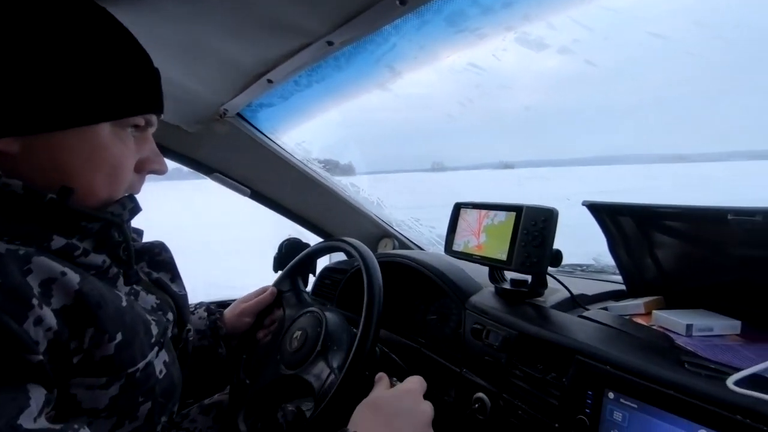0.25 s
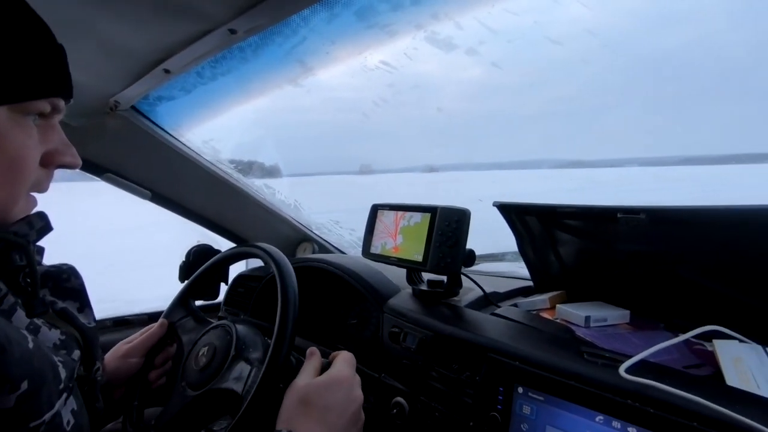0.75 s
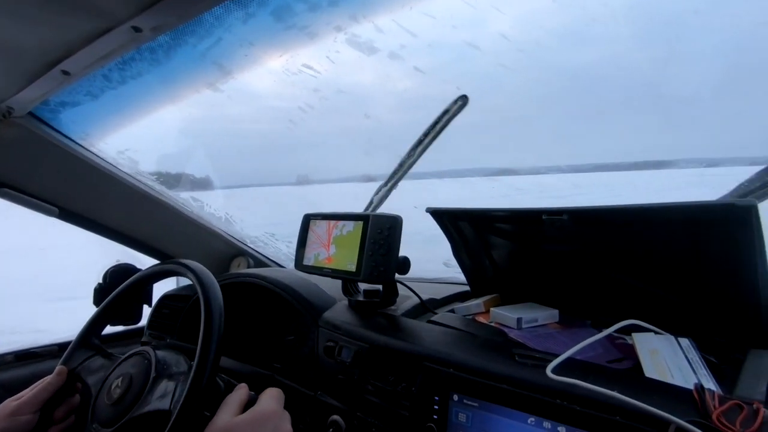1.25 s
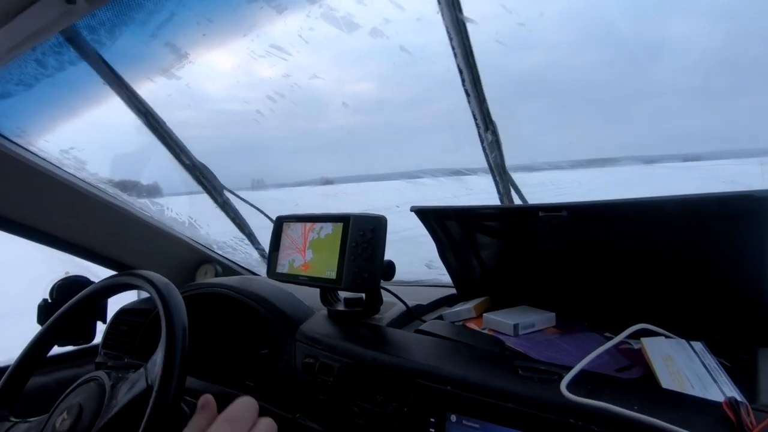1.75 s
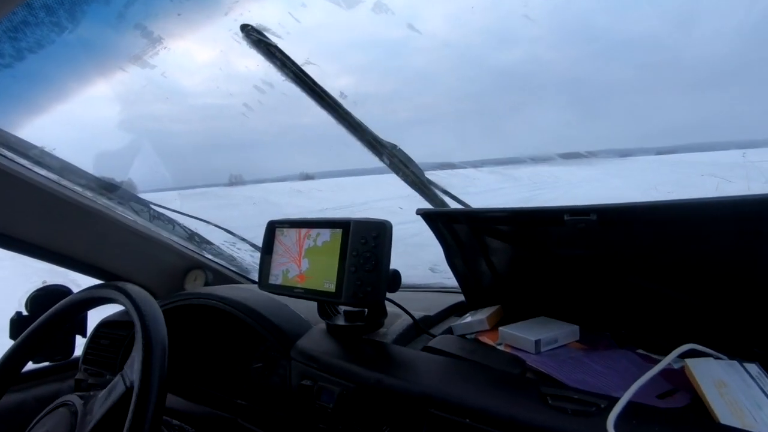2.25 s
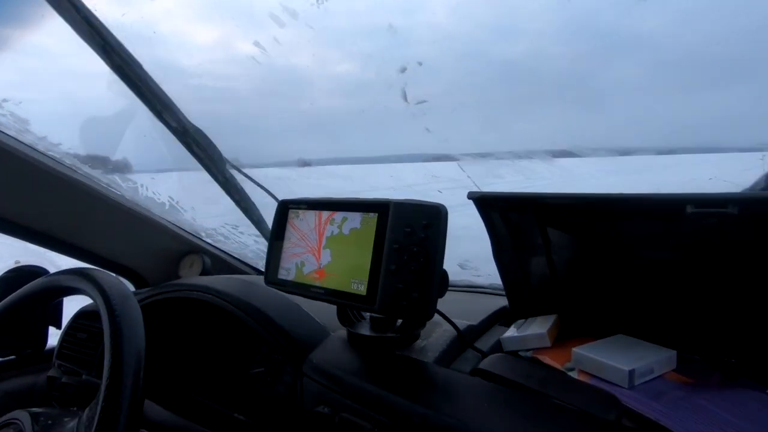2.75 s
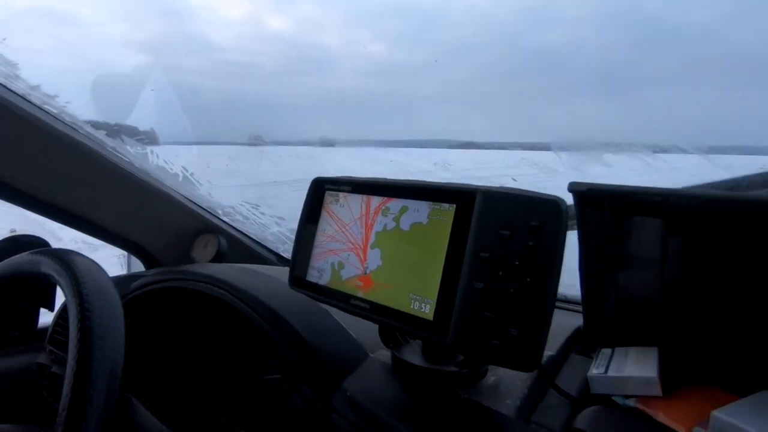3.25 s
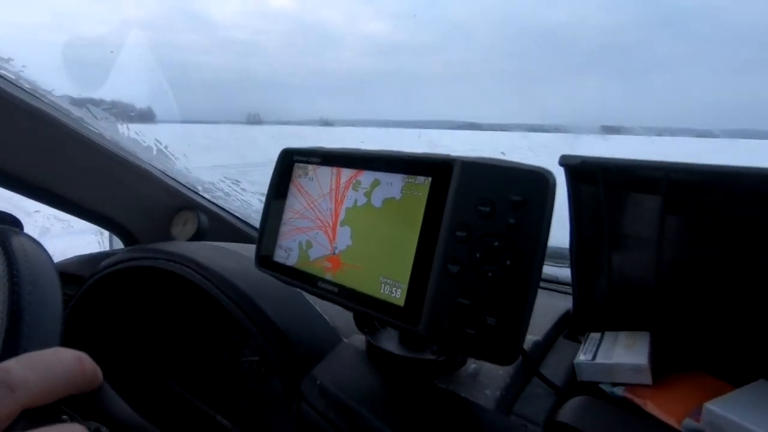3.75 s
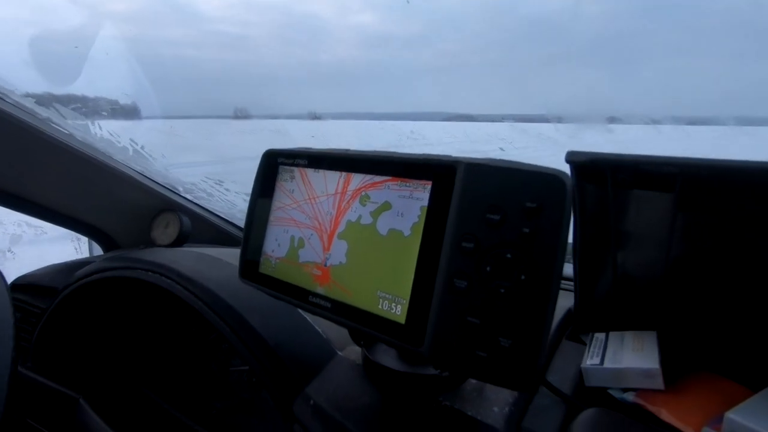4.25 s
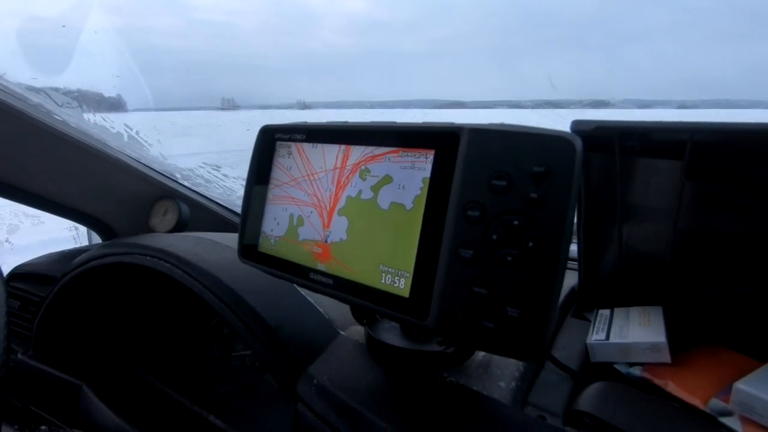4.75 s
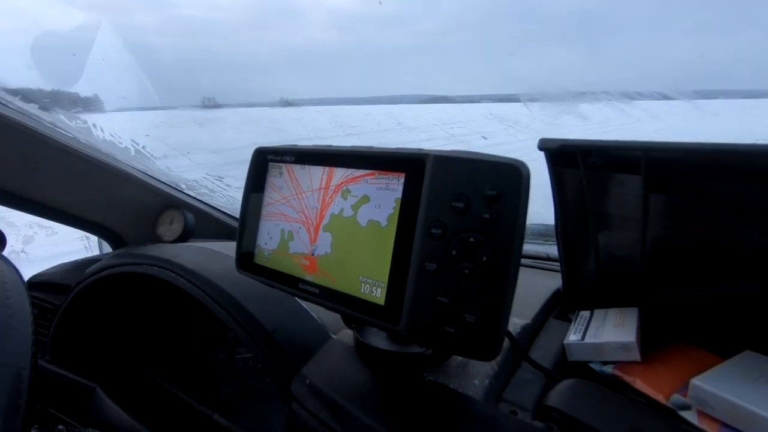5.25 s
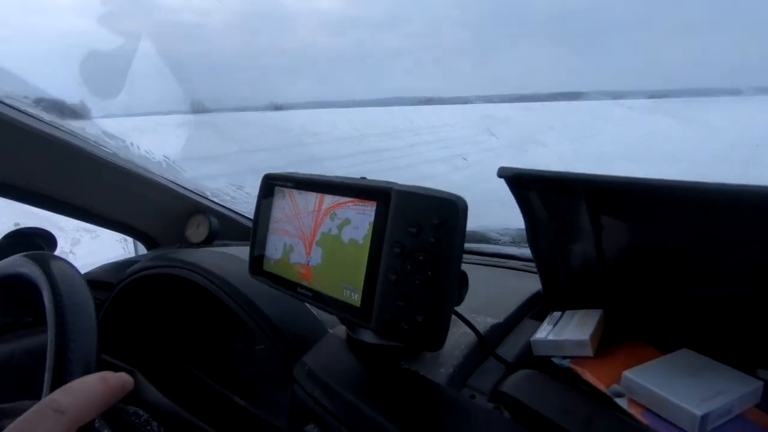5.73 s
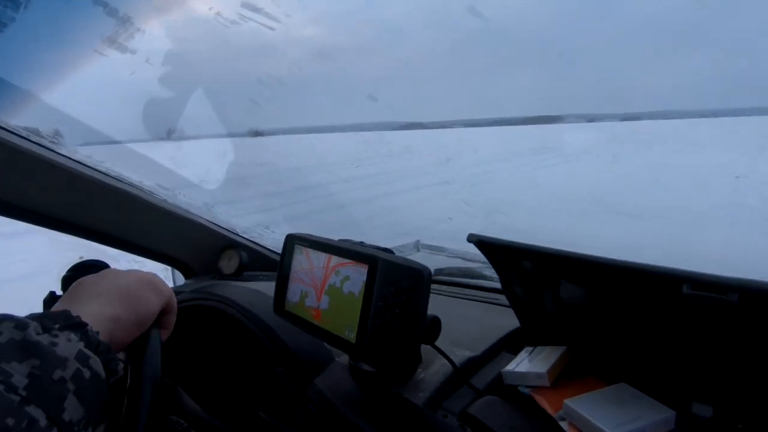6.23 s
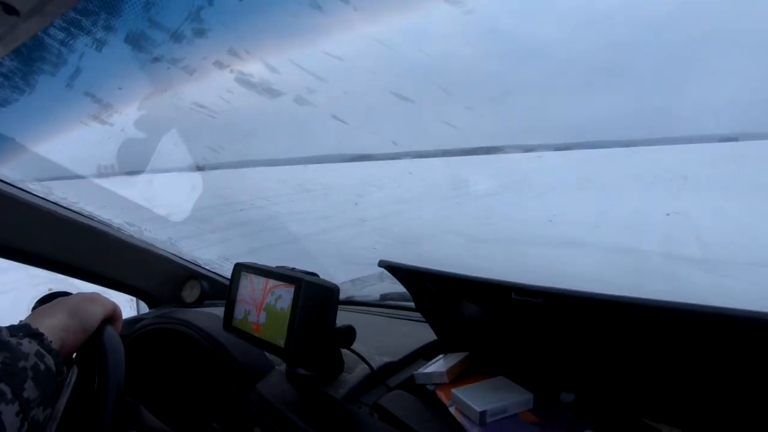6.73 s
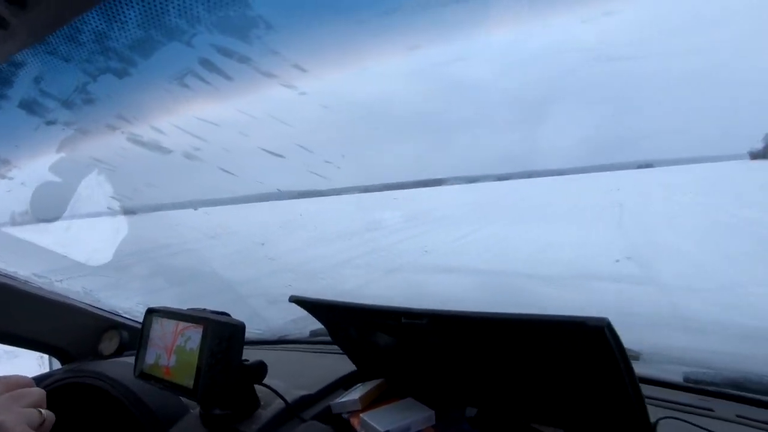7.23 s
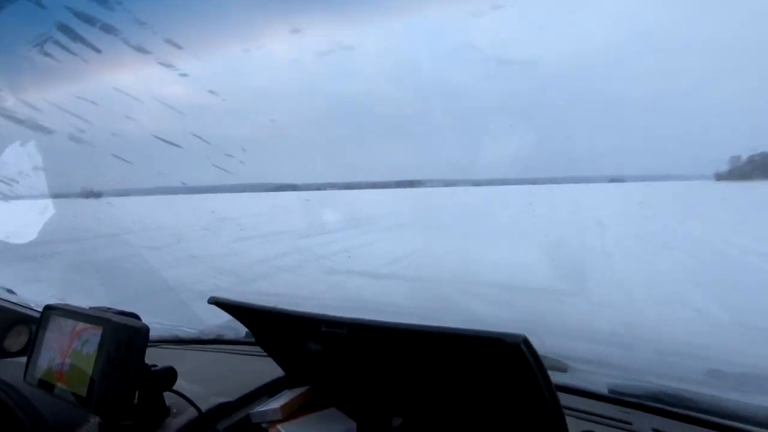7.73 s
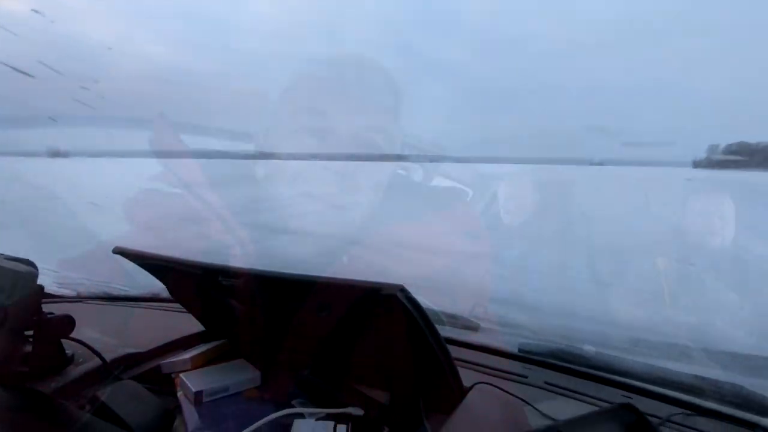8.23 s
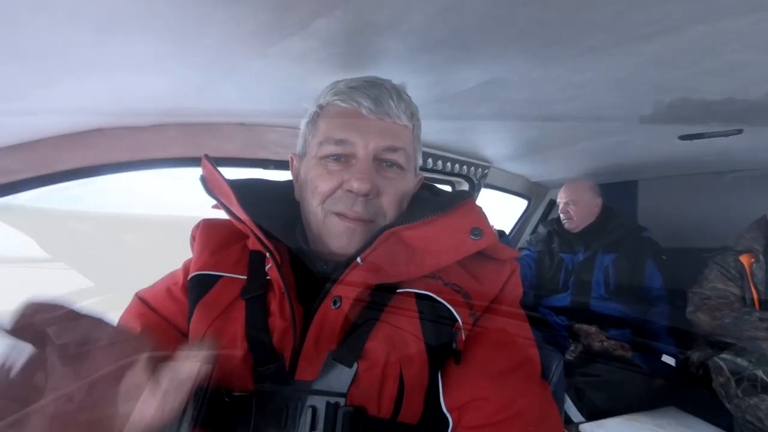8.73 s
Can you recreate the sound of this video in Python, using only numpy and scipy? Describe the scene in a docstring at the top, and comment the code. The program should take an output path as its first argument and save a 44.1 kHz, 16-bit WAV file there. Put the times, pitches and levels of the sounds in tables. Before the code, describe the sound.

For about nine seconds we are inside a hovercraft cabin at constant cruising speed. A loud, deep engine boom near 106 hertz holds almost the same pitch throughout, joined by lower shaft throbs, a fan hum and a ladder of buzzing propeller tones. Dark turbulent air and skirt rumble breathe beneath, mostly bass with little hiss. Small metal parts on the dashboard jingle finely and constantly. A clear double rattling knock comes around 0.55 seconds, smaller jolts at 1.3, 1.6 and 2.2, scattered tinkles from 2.6 to 5.5, then bumps at 5.9, 6.1 and 7.0 to 7.5, and a bright ringing cluster at 7.7. The close, hand-held microphone moves, so the blade tones shift in colour; upper ones become duller after 6.6. Near 8.5 the boom dips briefly to nothing and returns, while air rumble swells.

```python
"""Hovercraft cabin at cruising speed

A four-cylinder engine booms at its firing rate; it drives a four-blade propeller through a reduction and a
lift fan by belt, all as sines geared to the crank. Airflow and skirt rumble fill the cabin as coloured noise.
Small loose metal parts jingle on the dashboard as resonances rung by tiny contacts, jolted by bumps.
The propeller's blade tones swell and thin against two cabin echoes as the hand-held microphone leans."""
import sys
import numpy as np
from scipy import signal
from scipy.fft import rfft, irfft
from scipy.io import wavfile

SR = 44100
rng = np.random.default_rng(int(sys.argv[2]) if len(sys.argv) > 2 else 0)


def materialize(psi):
    """Save the field psi as 16-bit PCM at rate SR to the path in sys.argv[1].

    A 1-D psi becomes a single channel; in a 2-D psi each row is a channel.
    """
    bounded = np.clip(np.atleast_2d(psi).T, -1, 1)
    quanta = np.round(bounded * 32767).astype(np.int16)
    wavfile.write(sys.argv[1], SR, quanta)


N = 395998

PROPELLER_RATIO, FAN_RATIO = 0.3, 0.775   # shaft turns per crank turn
SOUND_M_PER_S = 343

# Airflow swells; only the change around each mean is heard.
# Each row: time in seconds, then level in dB of the bass, the low mids and the upper mids.
AIR_SWELLS = [(0, -28, -47.5, -58), (.3, -30.5, -45.5, -60), (.64, -29.5, -54.5, -58), (1, -29, -51.5, -60),
              (1.4, -29.5, -47.5, -59), (2.1, -30, -46, -59), (2.7, -33, -48.5, -60),
              (3.1, -32.5, -47, -60.5), (5.7, -30, -46.5, -60.5), (6.2, -31.5, -44.5, -60.5),
              (7.6, -30.5, -47, -60), (8.5, -26, -43, -59), (8.98, -26.5, -48, -58)]
# The hand-held microphone leans toward the windscreen and back.
# Each row: time in seconds, extra path of the first cabin echo in metres.
MICROPHONE_LEAN = [(0.0, 0.001), (1.0, -0.002), (1.6, 0.027), (2.2, 0.054), (2.7, 0.071), (3.2, 0.144),
                   (3.8, 0.159), (4.4, 0.195), (5.4, 0.192), (5.9, 0.125), (6.3, 0.065), (6.7, 0.021),
                   (7.2, 0.026), (8.0, 0.092), (8.98, 0.143)]
# Jingling resonances: three single parts first, then the whole tray.
# Each row: pitch in Hz, width of one resonator pass in Hz, relative drive in dB by rattling, and by jolts.
JINGLING_PARTS = [(6480, 330, 3, -6), (7070, 100, 9, -3), (9450, 330, 7, -6), (7720, 330, 2, -1),
                  (8300, 2800, -2, -4), (12700, 2400, -12, -5), (14700, 1800, -21, -11)]


def from_db(db):
    """Decibels to gain."""
    return 10 ** (np.asarray(db) / 20)


def rms_one(x):
    """Scale to unit rms."""
    return x / np.sqrt(np.mean(x ** 2) + 1e-20)


def in_time(rows):
    """Columns of a curve table, one value per sample."""
    s, *columns = np.transpose(rows)
    return [np.interp(np.arange(N) / SR, s, column) for column in columns]


def drift(rate_hz):
    """Slow random curve of spread 1: noise at every 40th sample through a double one-pole low-pass."""
    r = np.exp(-80 * np.pi * rate_hz / SR)
    noise = rng.standard_normal(N // 40 + 2002)
    slow = signal.lfilter([1], [1, -2 * r, r * r], noise)[2000:]   # without the filter's start-up
    return np.interp(np.arange(N) / 40, np.arange(len(slow)), rms_one(slow - slow.mean()))


def resonate(x, hz, width_hz):
    """Two-pole resonance, gain 1 on top."""
    r = np.exp(-np.pi * width_hz / SR)
    zeros = np.array([1, 0, -1]) * (1 - r * r) / 2
    poles = [1, -2 * r * np.cos(2 * np.pi * hz / SR), r * r]
    return signal.lfilter(zeros, poles, x)


def tone(turns, level_db, waver_db, rate_hz):
    """A sine locked to a shaft, at an rms level that wavers."""
    gain = np.sqrt(2) * from_db(level_db + waver_db * drift(rate_hz))
    return gain * np.sin(2 * np.pi * (turns + rng.random()))


def spells(rows):
    """Rows of start, hold and level as one gain: rise, hold, fall; powers add."""
    rise_s, fall_s = 0.035, 0.11
    t = np.arange(0, N + 40, 40) / SR
    power = np.zeros(len(t))
    for start_s, hold_s, level_db in rows:
        corners_s = np.cumsum([start_s - rise_s, rise_s, abs(hold_s), fall_s])
        power += from_db(2 * level_db) * np.interp(t, corners_s, [0, 1, 1, 0]) ** 2
    return np.interp(np.arange(N) / SR, t, np.sqrt(power))


def airflow():
    """Turbulent air and skirt rumble: coloured noise in five ranges, each breathing on its own."""
    # Colour of the rumble and airflow. Each row: frequency in Hz, relative level in dB per Hz.
    rumble = [(12, -30), (22, -12.5), (45, -6), (85, 1.5), (135, -5), (170, -8.5), (230, -15), (320, -18.5),
              (500, -24.5), (650, -30.5), (900, -37.5), (1500, -41), (2600, -48), (3300, -55), (4200, -52),
              (5100, -60.5), (9000, -63.5), (11000, -86.5), (13000, -68.5), (15500, -74.5)]
    wander_db, mids_loss_db_per_m = 1.2, 18.5
    hz = np.maximum(np.arange(N // 2 + 1) * SR / N, 1)
    knots_hz, colour_db = np.transpose(rumble)
    noise = rfft(rng.standard_normal(N)) * from_db(np.interp(np.log(hz), np.log(knots_hz), colour_db))
    # share of the spectrum below each range edge; neighbours differ by one range
    below = [0] + [1 / (1 + (hz / edge_hz) ** 6) for edge_hz in (160, 310, 520, 780)] + [1]

    bass_db, low_mid_db, upper_db = in_time(AIR_SWELLS)
    lean_m = in_time(MICROPHONE_LEAN)[0]
    # the highest of the three middle ranges sinks as the microphone leans forward
    middle_db = [low_mid_db + wander_db * drift(1.5) - loss * lean_m for loss in (0, 0, mids_loss_db_per_m)]
    out = np.zeros(N)
    for lower, upper, level_db in zip(below, below[1:], [bass_db, *middle_db, upper_db]):
        # the curves give the change, the spectrum the mean level
        breath = from_db(level_db - level_db.mean() + 0.67 * drift(11.0))
        out += irfft(noise * (upper - lower), N) * breath
    return out * from_db(-5.0)


def rattling():
    """How hard each part is shaken: the whole tray never rests, single parts follow it loosely."""
    # Spells of harder rattling of the whole tray. Each row: start in seconds, hold in seconds, drive in dB.
    shakes = [(0, 0.11, -61), (.54, 0.041, -68), (.7, 0.45, -73.5), (1.25, 0.095, -62), (1.6, 0.33, -66.5),
              (2.19, 0.14, -65), (2.64, 0.026, -63), (2.76, .03, -64.5), (3.1, 0.25, -67),
              (3.38, 0.051, -65.5), (3.57, 0.031, -63.5), (3.82, .04, -59), (3.9, 0.033, -61.5),
              (4.11, 0.18, -65), (4.53, .04, -68.5), (4.89, .02, -69), (5.02, 0.19, -71),
              (5.48, 0.064, -64), (5.7, .2, -70.5), (5.95, 0.015, -61.5), (6.13, 0.095, -63.5),
              (6.3, 0.38, -67), (6.92, .07, -62.5), (7.11, 0.1, -63.5), (7.4, .15, -71), (7.7, 0.098, -62),
              (7.95, 0.29, -66), (8.45, .2, -67)]
    # A single part rings out by itself.
    # Each row: start in seconds, hold in seconds, pitch of the part in Hz, drive in dB.
    solos = [(.7, 0.046, 6480, -66.5), (.75, .25, 9450, -74), (1.197, 0.12, 9450, -73),
             (1.55, 0.18, 9450, -71.5), (3.395, .05, 6480, -64), (3.58, 0.028, 6480, -66),
             (3.858, .06, 7070, -64.5), (5.1, 0.1, 6480, -71), (5.55, .25, 9450, -69),
             (7.203, 0.041, 6480, -62.5), (7.44, 0.027, 6480, -65), (7.702, 0.059, 6480, -55.5),
             (7.748, 0.086, 7070, -60), (7.8, 0.32, 9450, -68), (7.87, .04, 6480, -68),
             (8.02, .06, 7070, -68), (8.823, 0.027, 6480, -71)]
    tray_rest_db, part_under_tray_db, comes_and_goes_db = -67.5, (-8, -16.5, -12), 5.5
    tray = np.hypot(from_db(tray_rest_db), spells(shakes)) * from_db(1.8 * drift(29.0))
    drives = []
    for part, under_db in zip(JINGLING_PARTS, part_under_tray_db):
        own = [(s, hold_s, db) for s, hold_s, hz, db in solos if abs(hz / part[0] - 1) < .055]
        following = tray * from_db(under_db + comes_and_goes_db * drift(1.6))
        drives.append(following + spells(own))
    return drives + [tray] * (len(JINGLING_PARTS) - len(drives))


def knocks():
    """Bumps as short bursts of drive, one curve for the bright parts and one for the dull dashboard."""
    # Knocks that jolt the parts.
    # Each row: time in seconds, drive in dB of the bright parts, drive in dB of the dull body.
    jolts = [(0.546, -29.5, -43.5), (0.599, -36, -43.5), (1.3134, -45, -49), (1.3738, -44, -45.5),
             (1.6094, -45, -61), (1.7988, -55, -64), (2.1909, -47.5, -56.5), (2.6409, -46, -65),
             (2.7771, -47.5, -67), (3.8871, -48, -66), (5.886, -45.5, -53), (6.127, -45, -51),
             (6.9681, -44.5, -60.5), (7.1147, -41, -52.5), (7.2205, -49, -58), (7.2619, -49, -60),
             (7.4094, -49, -55), (7.5348, -52, -52)]
    rise_s, t60_s = .004, .075
    age = np.arange(SR // 4) / SR
    burst = from_db(-60 * age / t60_s) * np.minimum(age / rise_s, 1)
    bright, dull = np.zeros(N), np.zeros(N)
    for s, bright_db, body_db in jolts:
        at = round(s * SR)
        bright[at:at + len(age)] += burst * from_db(bright_db)
        dull[at:at + len(age)] += burst * from_db(body_db)
    return bright, dull


def jingle():
    """Dense tiny contacts ring the parts; a jolt is a short burst of them that also wakes the dashboard."""
    # Dull modes of the dashboard. Each row: pitch in Hz, width of one pass in Hz, relative drive in dB.
    dashboard = [(1790, 200, 1.5), (2350, 600, -7.5), (3100, 720, -7.5), (3930, 1300, -7.5)]
    sizes = from_db(1.9 * np.minimum(rng.exponential(1, N), 5)) * rng.choice([-1, 1], N)
    contacts = rms_one(sizes * (rng.random(N) < 6000 / SR))   # about 6000 contacts per second
    bright, dull = knocks()
    drives = [(hz, width_hz, dull * from_db(level_db + 16.0)) for hz, width_hz, level_db in dashboard]
    for (hz, width_hz, rattle_db, jolt_db), rattle in zip(JINGLING_PARTS, rattling()):
        flutter_db = (3 if width_hz < 1000 else 1.2) * drift(12.0)   # small parts flutter most
        drive = rattle * from_db(rattle_db + 13.5 + flutter_db) + bright * from_db(jolt_db + 1.5)
        drives.append((hz, width_hz, drive))
    out = np.zeros(N)
    for hz, width_hz, drive in drives:
        # each resonance meets the contacts at its own offset; the tiny constant keeps the filter awake
        struck = np.roll(contacts, rng.integers(N)) * drive + 1e-18
        out += resonate(resonate(struck, hz, width_hz), hz, width_hz)   # twice: steep skirts
    return out


def blade_tones(crank):
    """Upper propeller harmonics; each meets two echoes whose paths change as the microphone leans."""
    # Multiples of the propeller shaft speed, one per blade tone.
    multiples = [20, 28, 32, 36, 40, 44, 48, 52, 56, 60, 64, 68]
    # Each row: rms level in dB alone at mid time before dulling, lag at rest of the first echo and of the
    # second echo in wavelengths, slow trend in dB per second.
    blades = [(-44.0, 0.58, 0.38, -1.1), (-47.5, 0.43, 0.75, 0.26), (-53.5, 0.86, 0.31, 0.9),
              (-57.5, 0.33, 0.49, 0.7), (-58.5, 0.11, 0.76, 0.9), (-66.0, 0.77, 0.25, 0.2),
              (-67.5, 0.44, 0.79, -1.5), (-72, 0.78, 0.02, 0.9), (-61, 0.1, 0.41, 0.1),
              (-71.0, 0.82, 0.78, -0.5), (-71.5, 0.19, 0.25, 0.42), (-74.0, 0.3, 0.11, -0.4)]
    echo_share, second_echo_share, second_path_rate = .85, .5, 2.48   # the second path changes faster
    dulling_s, dulling_takes_s, dulling_db, dulling_above_hz = 6.6, .25, 8.5, 860
    t = np.arange(N) / SR
    lean_m = in_time(MICROPHONE_LEAN)[0]
    shaft_hz = PROPELLER_RATIO * crank[-1] * SR / N   # mean speed
    # late on, the upper blade tones drop and stay low
    drop_db = dulling_db * np.clip((t - dulling_s) / dulling_takes_s, 0, 1)
    out = np.zeros(N)
    for multiple, (level_db, lag, second_lag, trend) in zip(multiples, blades):
        hz = multiple * shaft_hz
        level_db = level_db + trend * (t - t.mean()) - drop_db * (hz > dulling_above_hz)
        extra = lean_m * hz / SOUND_M_PER_S   # in wavelengths
        echo = echo_share * np.exp(2j * np.pi * (lag + extra))
        second_echo = second_echo_share * np.exp(2j * np.pi * (second_lag + second_path_rate * extra))
        direct = tone(PROPELLER_RATIO * multiple * crank, level_db, waver_db=0.55, rate_hz=1.7)
        out += np.abs(1 + echo + second_echo) * direct
    return out


def shaft_tones(crank):
    """Steady tones at multiples of the engine, propeller and fan shaft speeds."""
    # Each row of the three tables: multiple of that shaft's speed, rms level in dB.
    engine_orders = [(1, -39), (2.5, -47.5), (3, -44.5), (3.5, -56.5), (4, -54.5), (4.5, -46), (5, -48),
                     (5.5, -62.5), (6.5, -60), (7, -65.5), (7.5, -61), (8, -61.5), (8.5, -66.5), (9, -62.5),
                     (10, -66), (10.5, -65.5), (13, -68)]
    propeller_orders = [(1, -52), (2, -55), (4, -39), (8, -39), (9, -49.5), (12, -53.5), (16, -55.5),
                        (24, -66.5), (33, -58.5), (34, -67), (72, -79.5), (80, -79)]
    fan_orders = [(1, -39.5), (3, -42)]
    bass_db, upper_bass_db = in_time(AIR_SWELLS)[:2]
    out = np.zeros(N)
    for ratio, orders in ((1, engine_orders), (PROPELLER_RATIO, propeller_orders), (FAN_RATIO, fan_orders)):
        for multiple, level_db in orders:
            per_turn = ratio * multiple   # cycles per crank turn
            # deep tones rise and fall with the airflow in their range
            deep_db = (bass_db - bass_db.mean()) * (per_turn < 2.6)
            deep_db += (upper_bass_db - upper_bass_db.mean()) * (3.2 < per_turn < 5.2)
            out += tone(per_turn * crank, level_db + deep_db, waver_db=2.5, rate_hz=0.32)
    return out


def firing_boom(crank):
    """Four cylinders fire twice a turn; late on, the boom fades through silence and returns inverted."""
    # Each row: time in seconds, rms level in dB.
    boom = [(0, -17.5), (.1, -14), (.67, -15.5), (1, -13), (1.25, -14.5), (3.4, -12.5), (3.9, -14),
            (6.4, -13.5), (8.2, -14), (8.98, -13)]
    turnover_s, turnover_length_s = 8.55, 0.47   # middle and length of the fade
    turnover = np.clip(2 * (turnover_s - np.arange(N) / SR) / turnover_length_s, -1, 1)
    return turnover * tone(2 * crank, in_time(boom)[0], waver_db=0.57, rate_hz=0.97)


def machinery():
    """All shafts are geared to the crank, so every tone follows its speed."""
    # Each row: time in seconds, crank speed in turns per second.
    crank_speed = [(0, 53.17), (0.5, 53.15), (1.1, 53.11), (1.7, 53.04), (2.3, 52.94), (2.9, 52.89),
                   (3.5, 52.93), (4.1, 53.01), (4.7, 53.04), (5.3, 53.1), (5.9, 52.96), (6.5, 52.86),
                   (7.1, 52.76), (7.7, 52.84), (8.3, 53.01), (8.98, 53.01)]
    crank = np.cumsum(in_time(crank_speed)[0]) / SR   # turns so far
    return blade_tones(crank) + shaft_tones(crank) + firing_boom(crank)


def scene():
    """Everything reaches one microphone."""
    return (airflow() + jingle() + machinery())[None]


def record(dry):
    """The microphone port cancels a treble band; the top is cut."""
    port_hz, port_width_hz, cutoff_hz = 10800, 4900, 15690
    notched = dry - resonate(dry[0], port_hz, port_width_hz)
    return signal.sosfilt(signal.ellip(12, .5, 70, cutoff_hz, fs=SR, output="sos"), notched)


dry = scene()
out = record(dry)
materialize(out)
```